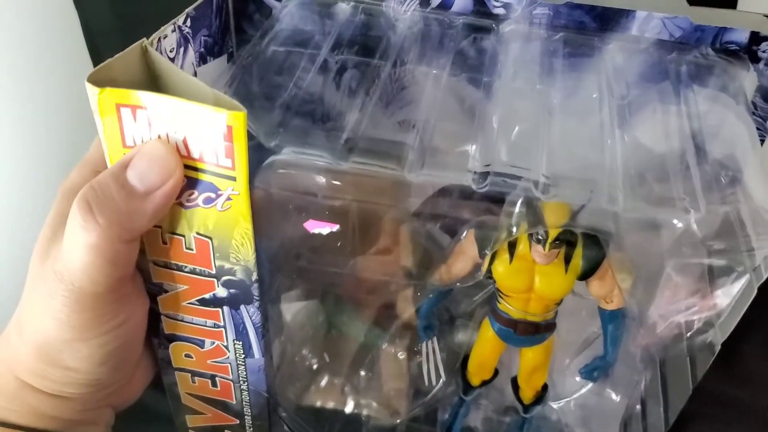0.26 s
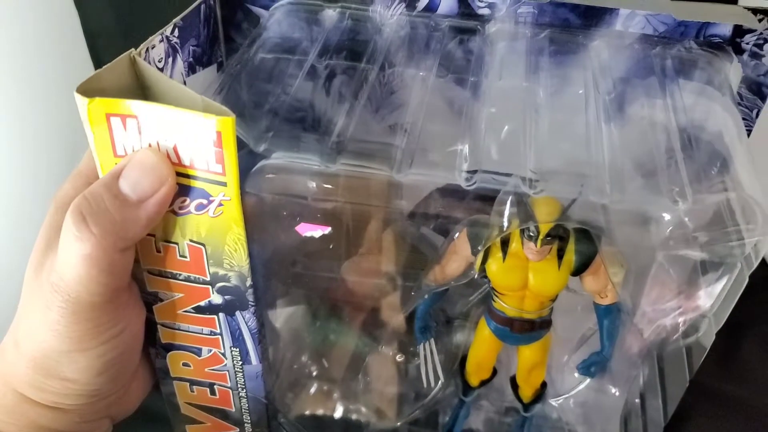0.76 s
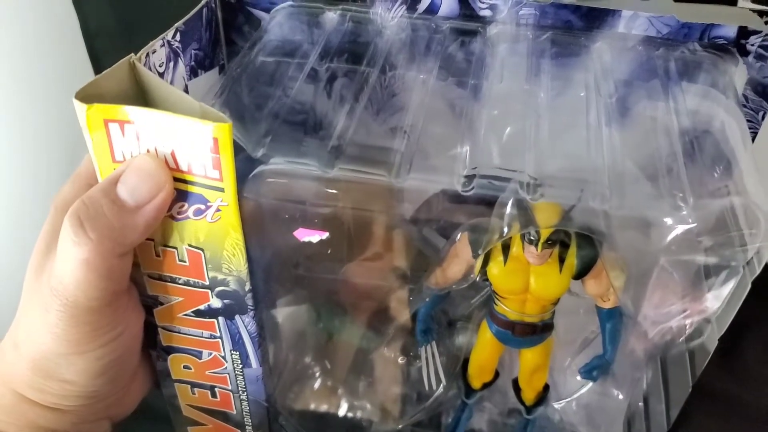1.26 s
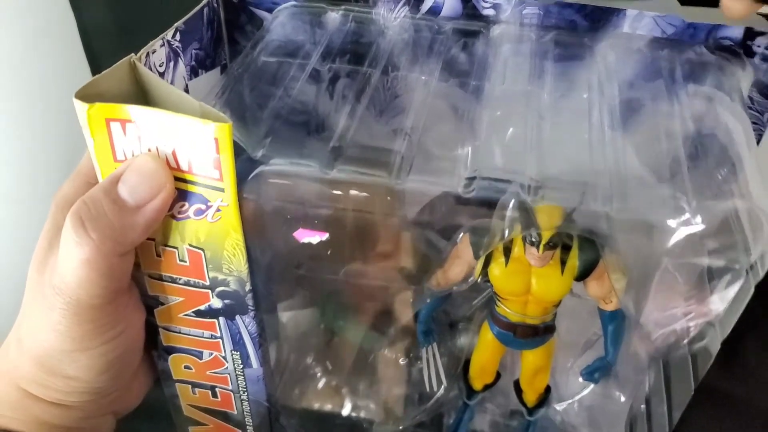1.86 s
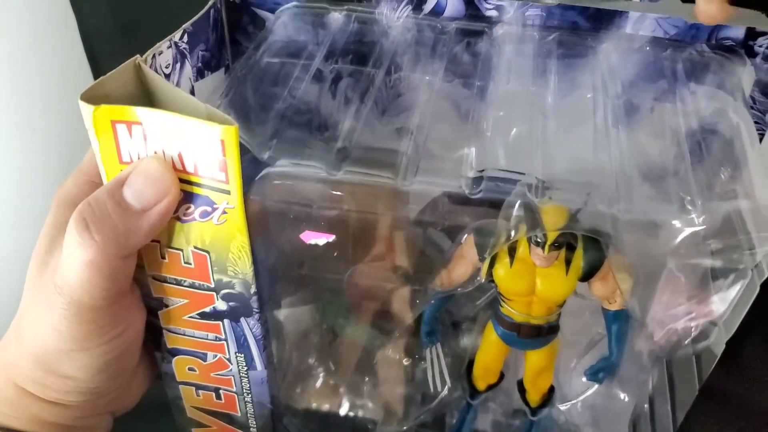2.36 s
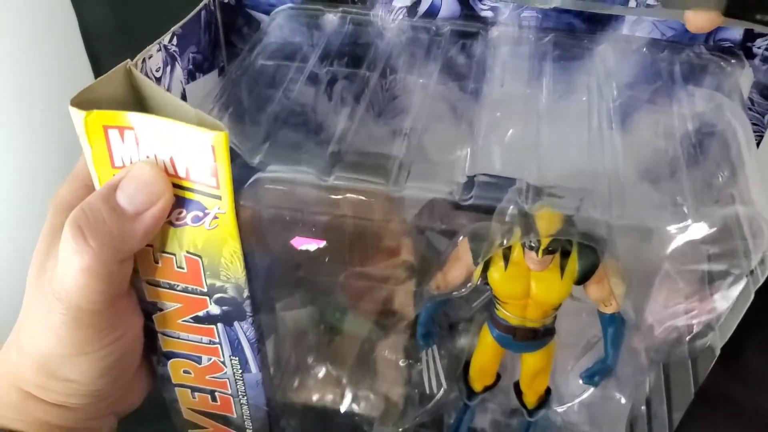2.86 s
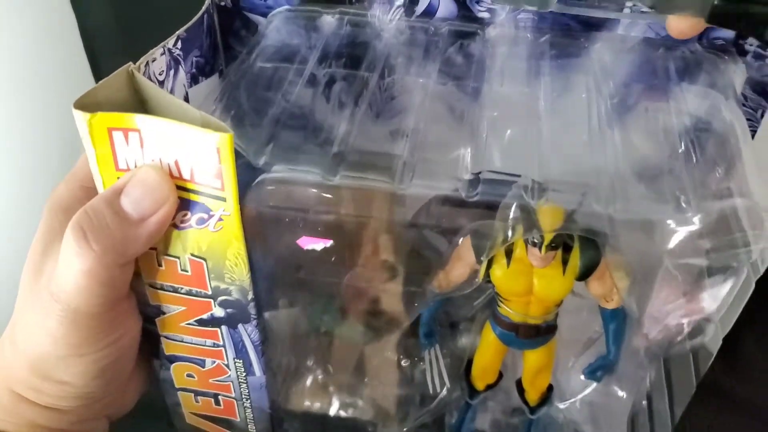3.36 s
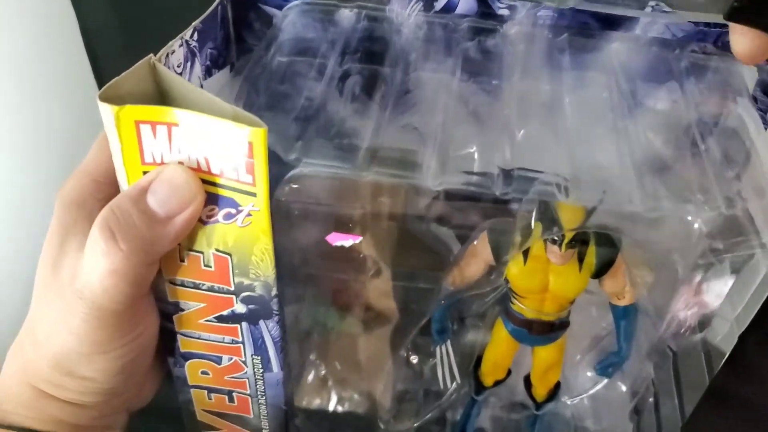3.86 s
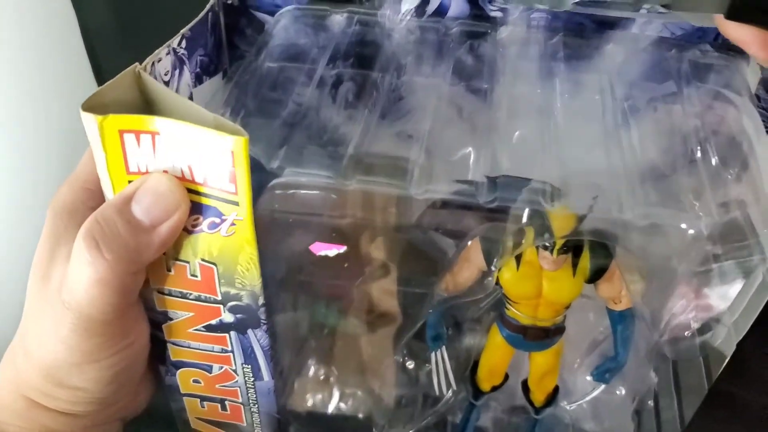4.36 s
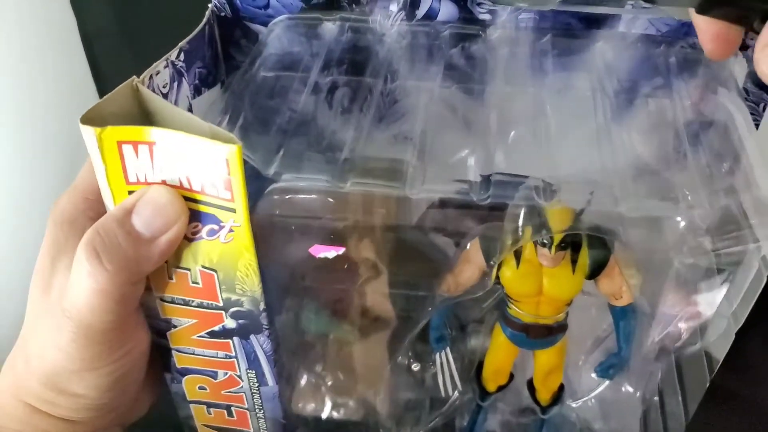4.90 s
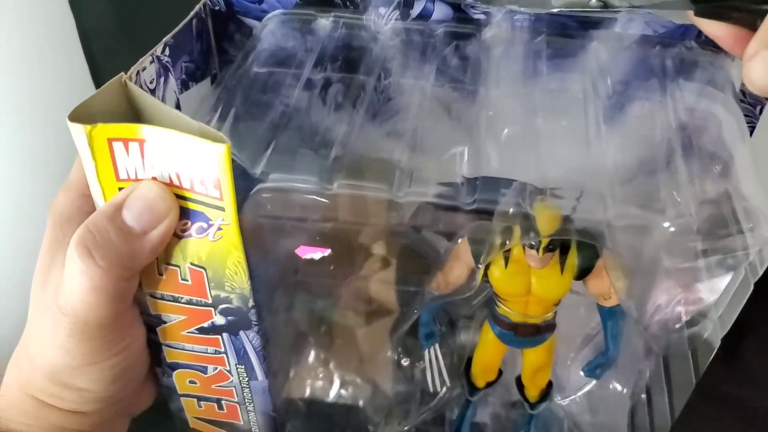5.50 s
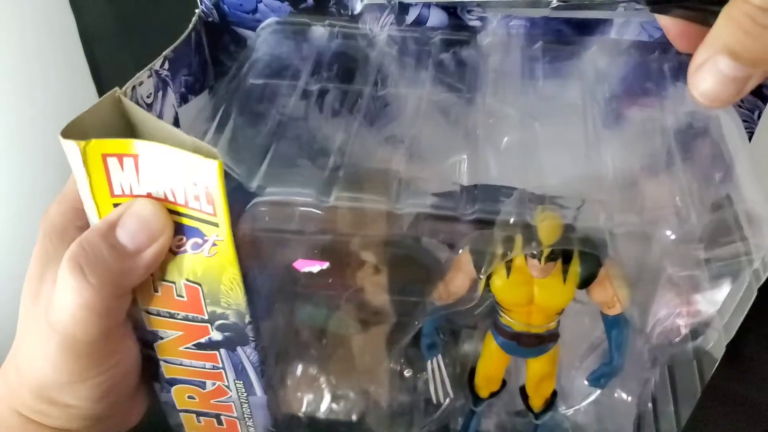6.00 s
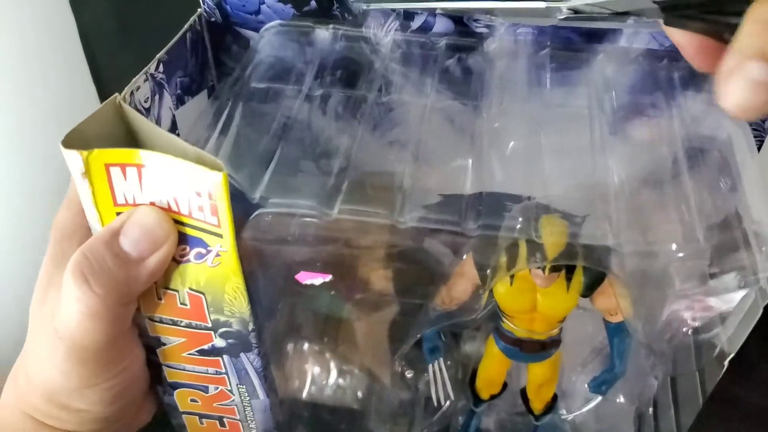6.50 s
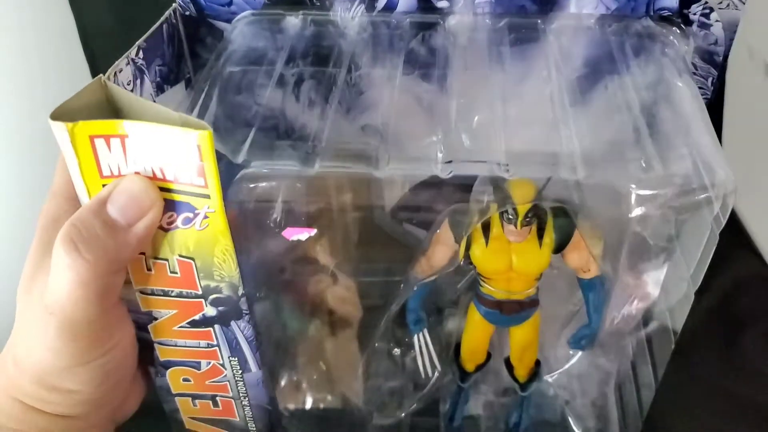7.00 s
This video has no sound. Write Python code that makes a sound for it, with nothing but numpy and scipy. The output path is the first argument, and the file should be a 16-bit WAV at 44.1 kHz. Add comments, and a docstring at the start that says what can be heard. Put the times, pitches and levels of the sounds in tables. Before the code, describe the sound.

A thin plastic tray is worked out of a cardboard box, heard up close in a quiet room with faint hiss. It begins with soft, scattered ticks and light rubbing, with a small hollow pop near 1 second and a stronger cluster of snaps around 2 seconds. From about 3 seconds the handling gets busier: the plastic sticks and slips on the cardboard in short, dry, crackling scrapes, mixed with irregular clicks and a few dull rubs. A firm hollow snap lands at 4 seconds, and lighter crackling continues. The scraping grows brighter just before 6 seconds, another strong snap comes at 6.2, and the loudest, sharpest crack hits at 6.6 with a brief burst of crackle. Around 7 seconds, scissor blades slide very softly with a thin metallic ring.

```python
"""Hollow snaps and dry crackle, up close in a quiet room: a thin plastic tray tugged out of a cardboard box.
Dents in the tray snap through, cracking the sheet and making box and tray ring.
Between snaps the sheet sticks and slips on the card, and a few smooth rubs sound a hollow of the box.
At the end a pair of scissor blades slides softly."""
import sys
import numpy as np
from scipy import signal
from scipy.fft import rfft, irfft
from scipy.io import wavfile
from scipy.ndimage import uniform_filter1d

SR = 44100
rng = np.random.default_rng(int(sys.argv[2]) if len(sys.argv) > 2 else 0)


def materialize(psi):
    """Save the field psi as 16-bit PCM at rate SR to the path in sys.argv[1].

    A 1-D psi becomes a single channel; in a 2-D psi each row is a channel.
    """
    bounded = np.clip(np.atleast_2d(psi).T, -1, 1)
    quanta = np.round(bounded * 32767).astype(np.int16)
    wavfile.write(sys.argv[1], SR, quanta)


N = 319725

# low ring of box and tray together: pitch_hz, level_db, free_t60_s
BODY_MODES = [(67, -5, 0.2), (172.6, -8, 0.04), (209, -3.5, 0.061), (347, -2.5, 0.13), (430.3, -3, 0.088),
              (502.4, -2, 0.054), (552, -5, 0.044), (708.4, -3.5, 0.068), (768, -5.5, 0.057),
              (884, -5, 0.056), (923, -9.5, 0.025)]
# midrange knock of the moulded pocket walls: pitch_hz, width_hz, level_db
WALL_BANDS = [(1060, 140, 6), (1347, 170, 3.5), (1481, 170, 3), (1810, 660, -5)]
# bright crack of the sheet's small stiff panels: pitch_hz, width_hz, level_db
PANEL_BANDS = [(3400, 1250, 1.5), (4104, 995, 4), (5030, 890, 0), (6340, 790, -4), (7200, 1000, -8)]
# top-end sizzle of the thin plastic: pitch_hz, width_hz, level_db
SIZZLE_BANDS = [(10450, 4900, -6.5), (12040, 4000, -3.5), (15500, 950, -2.5)]
# fader ride of the sizzle against the crack or crackle: time_s, offset_db
SIZZLE_RIDE = [(0, -8), (1.8, -7.5), (2.05, -7), (2.85, -10), (3.05, -20), (3.35, -1.5), (3.75, -14.5),
               (4.2, -8), (4.75, -19), (4.97, 1), (5.3, -10.5), (5.75, -18.5), (5.95, -3.5), (6.2, -20.5),
               (6.55, -12.5), (6.7, -3.5)]
# dents snapping through: start_s, thump_db, crack_db, ring_hz
SNAPS = [(0.195, -40, -54, 480), (0.473, -45, -69, 450), (0.497, -51, -60.5, 406), (0.722, -49, -49, 850),
         (0.888, -46.5, -50, 410), (0.975, -27.5, -48.5, 380), (1.208, -58, -60, 393),
         (1.64, -36.5, -53.5, 460), (1.796, -22, -36, 337), (1.876, -50, -57.5, 516),
         (1.921, -45, -55, 716), (1.963, -39, -47, 452), (2.013, -38, -34.5, 367), (2.441, -43, -64, 890),
         (2.724, -50, -55, 460), (2.816, -36, -53, 362), (2.876, -36, -58, 342), (2.906, -39, -48, 424),
         (3.037, -27, -48, 353), (3.083, -31.5, -41, 410), (3.1, -31.5, -41, 340), (3.169, -51, -52, 347),
         (3.315, -51, -51.5, 880), (3.339, -48, -50.5, 334), (3.385, -67, -57.5, 400),
         (3.416, -55, -51.5, 533), (3.438, -32, -54, 405), (3.618, -50, -54, 770),
         (3.676, -42.5, -47.5, 345), (3.775, -39.5, -49.5, 331), (3.809, -34, -42.5, 478),
         (4.006, -17.5, -33, 380), (4.062, -40, -51, 410), (4.074, -33, -36, 686), (4.274, -47, -49.5, 894),
         (4.361, -45.5, -53.5, 370), (4.459, -40.5, -57, 710), (4.684, -37, -58, 430),
         (4.733, -48, -55, 392), (4.757, -35, -44, 750), (4.829, -40, -59, 416), (4.909, -52, -50.5, 938),
         (4.943, -70, -51, 409), (4.993, -45, -50.5, 759), (5.045, -31.5, -42, 740),
         (5.292, -41, -49.5, 328), (5.385, -32.5, -43.5, 390), (5.414, -54, -48, 327),
         (5.437, -74, -45.5, 334), (5.464, -63, -52, 398), (5.545, -42.5, -42, 334), (5.868, -34, -37, 930),
         (5.952, -43, -47, 332), (6.118, -49, -47, 850), (6.188, -17.5, -29, 766), (6.25, -42, -49.5, 826),
         (6.277, -29, -39, 493), (6.394, -35.5, -39.5, 700), (6.476, -67, -59, 408),
         (6.613, -19, -15.5, 320), (6.667, -27, -32, 520), (6.694, -36.5, -33.5, 420),
         (6.733, -26, -43.5, 462), (7.129, -74.5, -61.5, 505), (7.188, -68, -63, 775)]


def dent_snaps(rise_s=0.000089, tremble_s=0.051, tremble_db=-24, focus_oct=.4, scatter_db=5.0, detune=0.033):
    """Each dent flips in a few ms: the ragged push cracks the sheet and rings the body near its pitch."""
    out, t = np.zeros(N + SR), np.arange(SR // 4) / SR
    mode_hz, mode_db, free_t60_s = np.transpose(BODY_MODES)[:, :, None]
    held_t60_s = 0.54 * free_t60_s  # the grip damps the ring
    for start_s, thump_db, crack_db, ring_hz in SNAPS:
        flip_s = max(0.0053 * np.exp(0.23 * rng.standard_normal()), .001)
        chance, noise = rng.standard_normal((3, len(BODY_MODES), 1)), rng.standard_normal((4, len(t)))
        push = (1 - np.exp(-t / rise_s)) * np.exp(-(t / flip_s) ** 2)
        heave = np.exp(-(t / (1.51 * flip_s)) ** 2)  # the heavier body is pushed for longer
        shake = noise * (push + undb(tremble_db) * np.exp(-t / tremble_s))  # the sheet trembles on
        focus_db = np.maximum(-6 * (np.log2(mode_hz / ring_hz) / focus_oct) ** 2, -6)
        gain = undb(mode_db + focus_db + scatter_db * chance[0])
        decay = np.exp(-np.log(1000) * t / held_t60_s)
        modes = gain * decay * np.sin(2 * np.pi * mode_hz * (1 + detune * chance[1]) * t)
        ring = modes[::2].sum(axis=0) - modes[1::2].sum(axis=0)  # neighbours start in opposite directions
        thump = signal.fftconvolve(ring, heave * noise[3])[:len(t)]
        thump = butter(thump, 1, 260, "high")  # a flip this quick barely moves the lowest modes
        # each dent sits on other panels; harder cracks reach the higher ones
        tilt_db_per_oct = 0.029 * (crack_db + 50)
        panels = [(hz, width, db + 3 * rng.standard_normal() + tilt_db_per_oct * np.log2(hz / 4000))
                  for hz, width, db in PANEL_BANDS]
        sizzle_db = crack_db + sizzle_offset_db(start_s) - 3  # snaps sizzle less than strokes
        layers = ((thump, thump_db),
                  (resonate(shake[0], WALL_BANDS), wall_db(thump_db, crack_db, trim_db=-3)),
                  (resonate(shake[1], panels), crack_db),
                  (resonate(shake[2], SIZZLE_BANDS), sizzle_db))
        start = int(start_s * SR)
        for layer, level_db in layers:
            peak_rms = np.sqrt(uniform_filter1d(layer ** 2, size=128).max())
            out[start:start + len(t)] += layer * undb(level_db - 2.5) / peak_rms
    return out[:N]


# strokes of the tray along the card: start_s, length_s, rumble_db, crackle_db
DRAG_STROKES = [(0.059, 0.051, -67.5, -78), (0.209, 0.033, -44, -61), (0.441, 0.095, -63.5, -82),
                (0.603, 0.033, -59.5, -89), (0.683, 0.11, -66.5, -83), (0.857, 0.19, -58, -78.5),
                (1.169, 0.21, -62, -82), (1.457, 0.028, -59.5, -76), (1.74, 0.13, -62, -78),
                (1.905, 0.23, -52.5, -65.5), (2.214, 0.27, -64.5, -76), (2.723, 0.066, -50.5, -69.5),
                (2.87, 0.065, -46, -62.5), (2.981, 0.14, -41, -57), (3.141, 0.093, -54.5, -75),
                (3.321, 0.17, -56.5, -70.5), (3.502, 0.04, -54, -68), (3.63, 0.23, -49.5, -62.5),
                (3.852, 0.22, -59.5, -78), (4.027, 0.065, -45.5, -58), (4.271, 0.13, -54.5, -69.5),
                (4.429, 0.11, -61, -78), (4.614, 0.29, -52, -66), (4.731, 0.06, -41.5, -59),
                (4.923, 0.16, -50.5, -61.5), (5.218, 0.051, -56, -71), (5.29, 0.19, -52, -61.5),
                (5.515, 0.13, -56, -66), (5.728, 0.15, -40, -56.5), (5.842, 0.061, -38.5, -43.5),
                (5.927, 0.1, -45.5, -51.5), (6.092, 0.047, -50, -67), (6.303, 0.14, -49.5, -62.5),
                (6.464, 0.053, -50, -68), (6.558, 0.047, -37, -47.5), (6.638, 0.11, -37, -46.5)]


def tray_drag(edge_s=0.018, damping=1.79):
    """The sheet sticks and slips on card; the same jerks shake body, walls and panels."""
    power, t = np.zeros((4, N)), np.arange(N) / SR  # rows: body, walls, panels, sizzle
    for start_s, length_s, rumble_db, crackle_db in DRAG_STROKES:
        span = slice(max(int((start_s - .08) * SR), 0), int((start_s + length_s + .08) * SR))
        levels_db = [rumble_db, wall_db(rumble_db, crackle_db, trim_db=-2.5), crackle_db, crackle_db]
        power[:, span] += (undb(levels_db)[:, None] * stroke(t[span], start_s, length_s, edge_s)) ** 2
    power[3] *= undb(2 * sizzle_offset_db(t))
    # pressed against the card the body is damped, so its modes widen
    body_bands = [(hz, damping * np.log(1000) / np.pi / t60_s, db) for hz, db, t60_s in BODY_MODES]
    jerks = .9 + stick_slip(rate_hz=300, spread_db=2.2, slip_s=.003)
    out = 0
    for gain, bands in zip(np.sqrt(power), (body_bands, WALL_BANDS, PANEL_BANDS, SIZZLE_BANDS)):
        friction = jerks * stick_slip(rate_hz=2200, spread_db=2.55, slip_s=0.0015) * rng.standard_normal(N)
        out += resonate(gain * friction, bands) / np.std(resonate(friction, bands))
    return undb(0.5) * out


# soft rubs that each sound one hollow of the box: start_s, length_s, pitch_hz, level_db
HOLLOW_RUBS = [(2.611, 0.089, 329, -60), (3.789, 0.06, 465, -42.5), (3.965, 0.033, 735, -55),
               (5.819, 0.016, 1990, -45.5), (6.645, 0.05, 400, -45), (6.724, 0.033, 624, -48)]


def hollow_rubs(edge_s=0.0056, q=12.0):
    """A smooth rub drives a single air pocket: a dull, wavering note."""
    out, t = 0, np.arange(N) / SR
    for start_s, length_s, pitch_hz, level_db in HOLLOW_RUBS:
        note = unit_rms(resonate(rng.standard_normal(N), [(pitch_hz, pitch_hz / q, 0)]))
        out += undb(level_db) * stroke(t, start_s, length_s, edge_s) * note
    return out


# ring of the scissor blades: pitch_hz, width_hz, level_db
BLADE_BANDS = [(2396, 47, -5), (3440, 29, -10), (3845, 87, -1), (6600, 400, -10), (8300, 180, -19),
               (9960, 300, -19)]
# slides of blade on blade: start_s, length_s, level_db
BLADE_SLIDES = [(6.798, 0.086, -65.5), (6.896, 0.069, -62), (6.997, .11, -67.5)]


def scissor_slides(edge_s=0.02):
    """Steel rubs on steel: a thin, grainy ring."""
    t = np.arange(N) / SR
    envelope = sum(undb(db) * stroke(t, start_s, length_s, edge_s) for start_s, length_s, db in BLADE_SLIDES)
    friction = stick_slip(rate_hz=830, spread_db=1.8, slip_s=0.0025) * rng.standard_normal(N)
    return envelope * unit_rms(resonate(friction, BLADE_BANDS))


def reflections(x, t60_s=.12, level_db=-14, side_db=-14):
    """Table and walls throw back a short diffuse tail, starting after 3 ms."""
    t = np.arange(SR // 3) / SR
    mid, side = rng.standard_normal((2, len(t))) * np.exp(-np.log(1000) * t / t60_s) * (t > .003)
    tails = stereo(mid, undb(side_db) * side) / np.linalg.norm(mid)
    return undb(level_db) * signal.fftconvolve(x[None], tails)[:, :N]


# EQ curve of the noise bed: frequency_hz, gain_db
ROOM_TONE_EQ = [(18, -54), (30, -9.5), (95, -6.5), (233, -6), (345, -1.5), (937, -9), (1070, -10),
                (1320, -19), (2680, -23), (4300, -16), (10800, -25), (12300, -15.5), (16000, -28)]


def room_tone(mid_db=-72, side_db=-11.5, lean_left=0.36):
    """A bed of room tone and microphone hiss, slightly wide and stronger on the left."""
    hz, db = np.transpose(ROOM_TONE_EQ)
    eq = undb(np.interp(np.log(np.fft.rfftfreq(N, 1 / SR) + 1), np.log(hz), db))
    mid, side = irfft(eq * rfft(rng.standard_normal((2, N))), N)
    return undb(mid_db) * stereo(mid, undb(side_db) * side + lean_left * mid) / np.std(mid)


def stick_slip(rate_hz, spread_db, slip_s):
    """Envelope of brief slips at random moments, mostly small, a few large; rms 1."""
    chance, size, jitter = rng.random(N), rng.exponential(size=N), rng.standard_normal(N)
    slips = unit_rms((chance < rate_hz / SR) * undb(spread_db * size) * jitter)
    decay = np.exp(-1 / (slip_s * SR))
    return unit_rms(np.sqrt(signal.lfilter([1], [1, -decay], slips ** 2)))


def stroke(t, start_s, length_s, edge_s):
    """Envelope of one rub, fading softly in and out."""
    return (np.tanh((t - start_s) / edge_s) - np.tanh((t - start_s - length_s) / edge_s)) / 2


def wall_db(body_db, panel_db, trim_db):
    """The pocket walls follow a blend of the body and panel levels."""
    return 0.28 * body_db + 0.72 * panel_db + trim_db


def sizzle_offset_db(t):
    """The sizzle fader at time t."""
    return np.interp(t, *np.transpose(SIZZLE_RIDE))


def resonate(x, bands):
    """Parallel band-passes (pitch_hz, width_hz, level_db), alternating in polarity."""
    return sum((-1) ** k * undb(db) * signal.lfilter(*signal.iirpeak(hz, hz / width, SR), x)
               for k, (hz, width, db) in enumerate(bands))


def butter(x, order, cutoff_hz, kind):
    """Gentle high-pass or low-pass."""
    return signal.lfilter(*signal.butter(order, cutoff_hz, kind, fs=SR), x)


def stereo(mid, side):
    """Mid and side to left and right."""
    return np.array([mid + side, mid - side])


def undb(db):
    """dB to gain."""
    return 10 ** (np.asarray(db) / 20)


def unit_rms(x):
    """Scale to rms 1."""
    return x / np.sqrt(np.mean(x ** 2))


def scene():
    """The handling sits dead centre, with a little more bass on the left and slight width in the treble."""
    handling = dent_snaps() + tray_drag() + hollow_rubs() + scissor_slides()
    handling = butter(handling, 2, 170, "high")  # a small open tray radiates little bass
    bass = butter(handling, 1, 110, "low")
    late_treble = np.roll(butter(handling, 2, 7000, "high"), shift=5)
    side = 0.14 * bass + .06 * late_treble + .015 * handling
    return stereo(handling, side) + reflections(handling) + room_tone()


def record(dry):
    """The phone cuts the top steeply above 15850 Hz."""
    return signal.sosfilt(signal.ellip(10, .3, 60, 15850, fs=SR, output="sos"), dry)


dry = scene()
out = record(dry)
materialize(out)
```